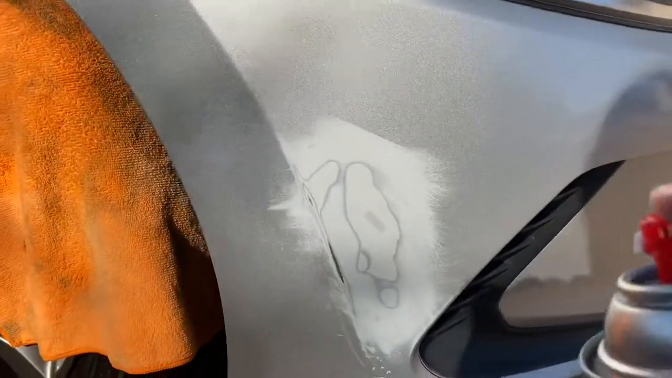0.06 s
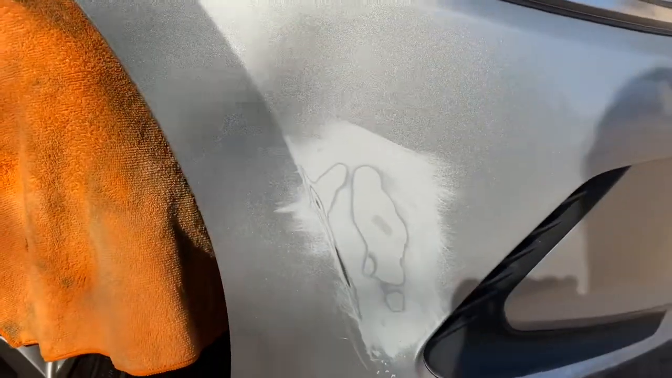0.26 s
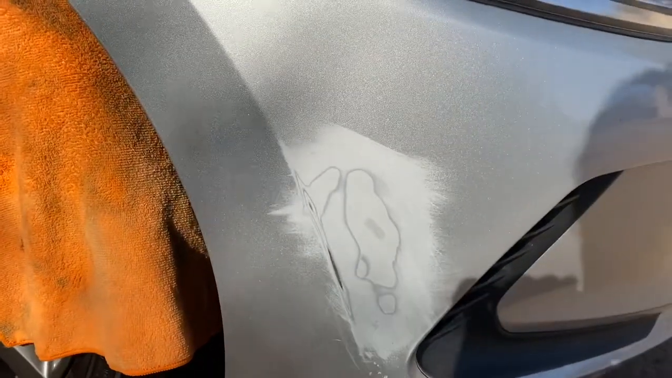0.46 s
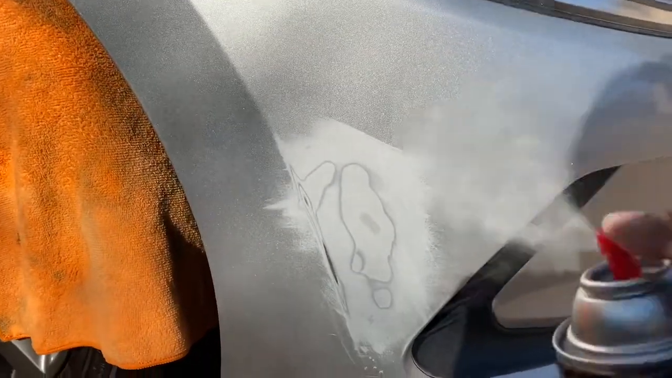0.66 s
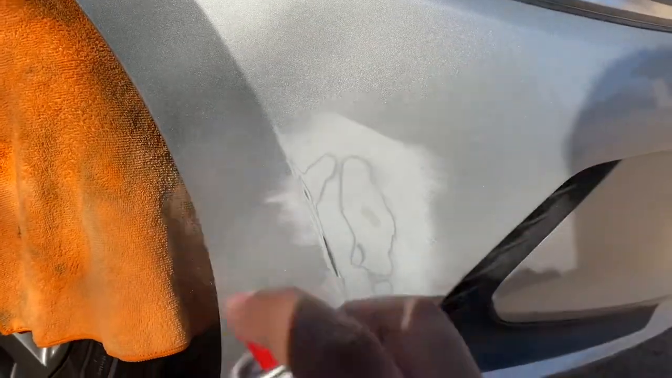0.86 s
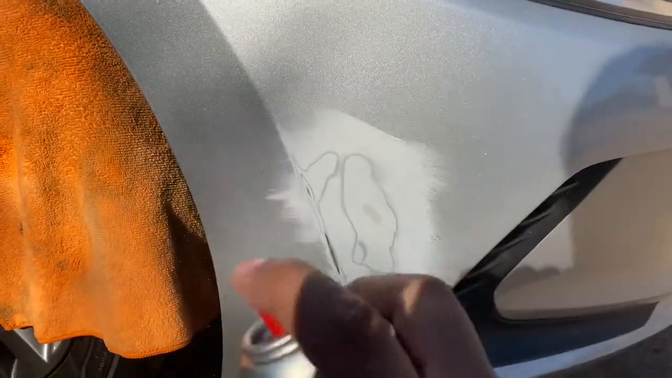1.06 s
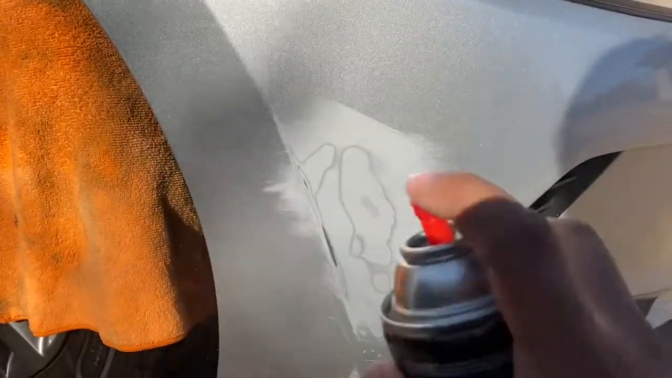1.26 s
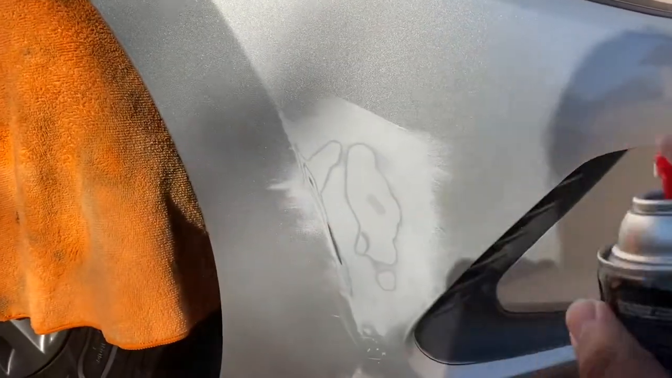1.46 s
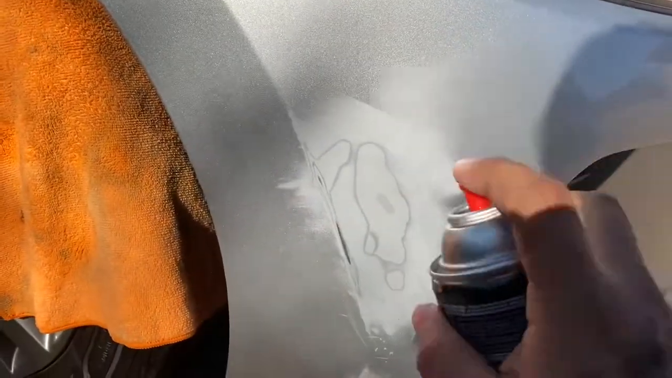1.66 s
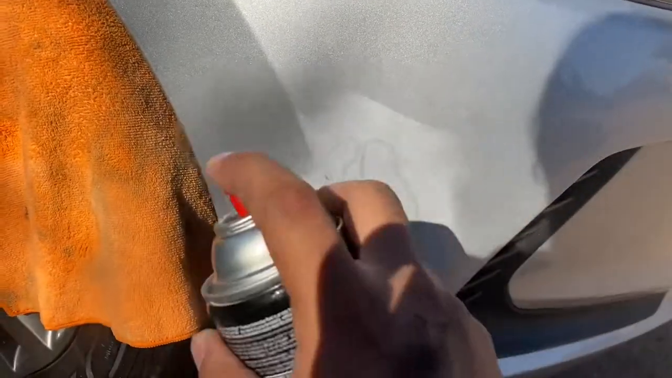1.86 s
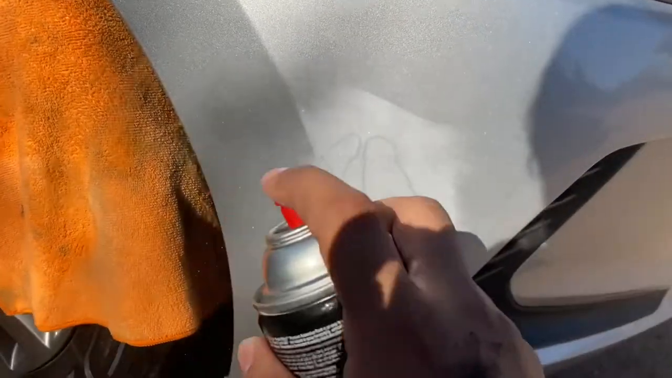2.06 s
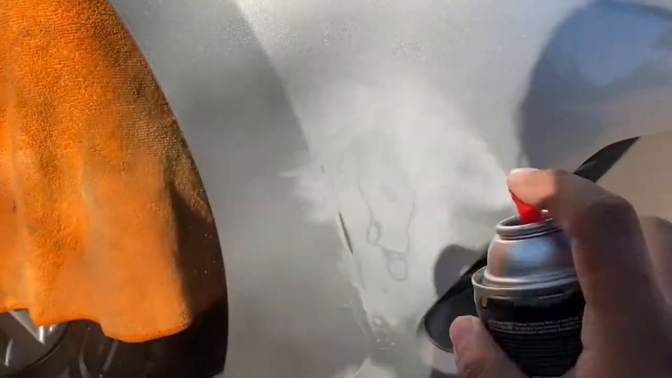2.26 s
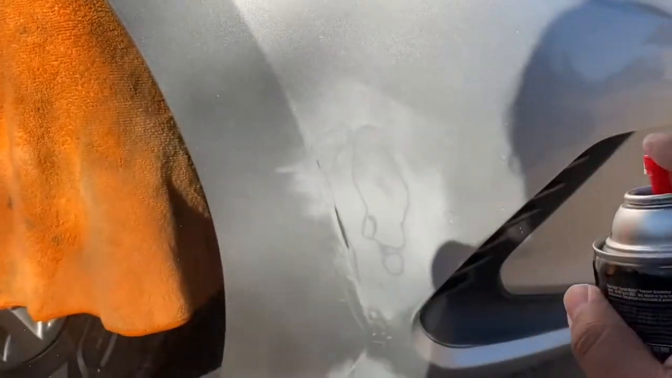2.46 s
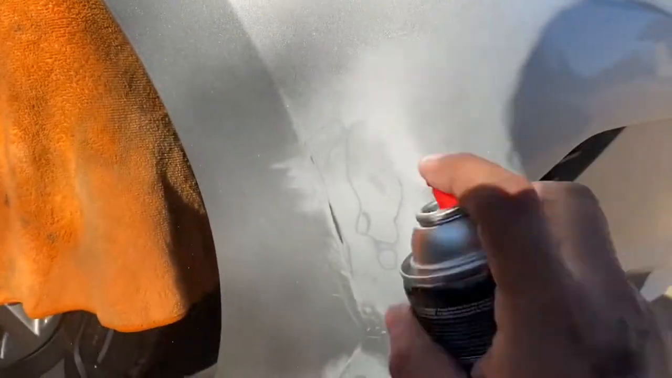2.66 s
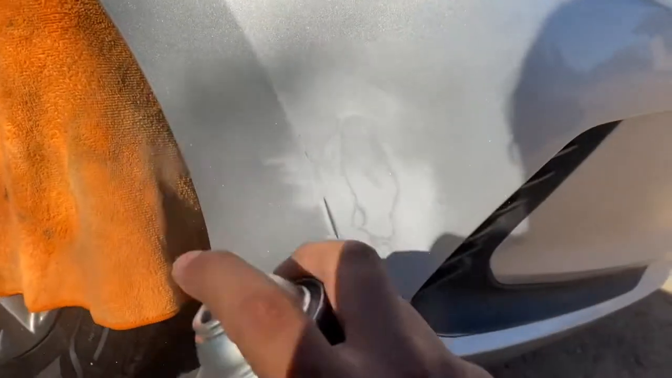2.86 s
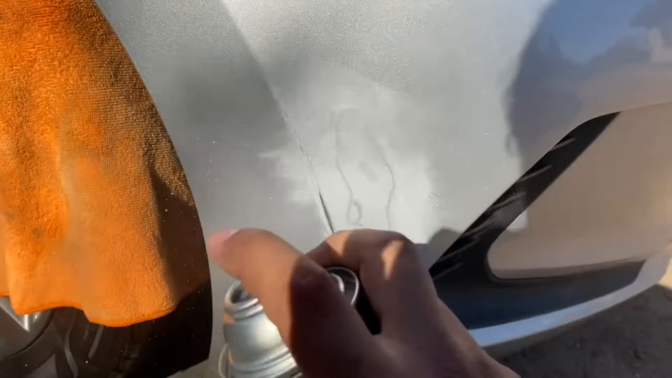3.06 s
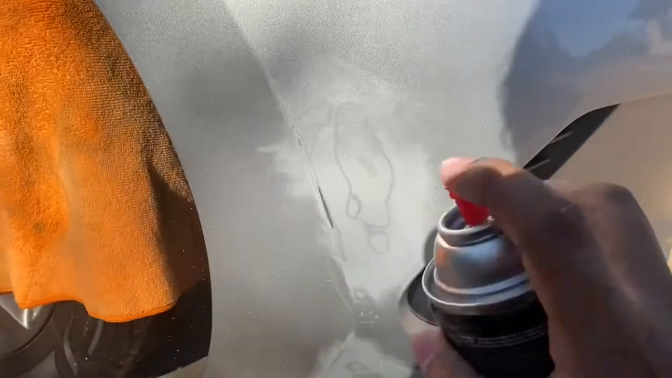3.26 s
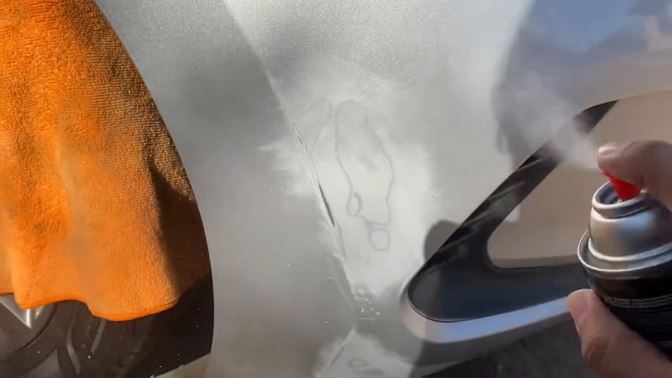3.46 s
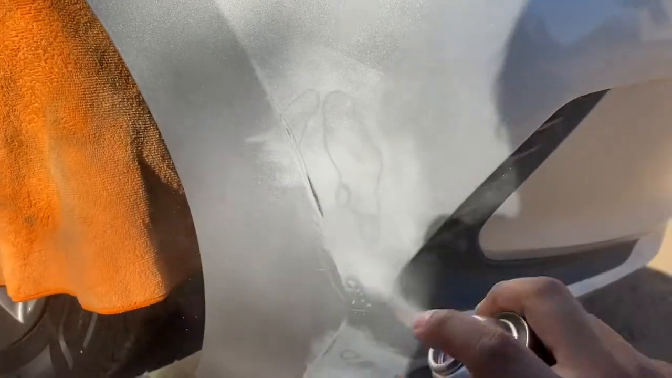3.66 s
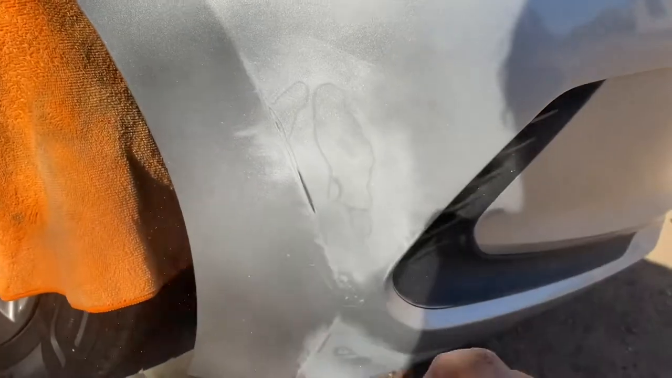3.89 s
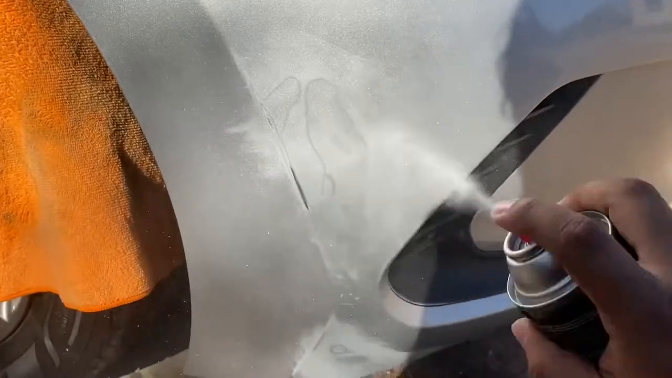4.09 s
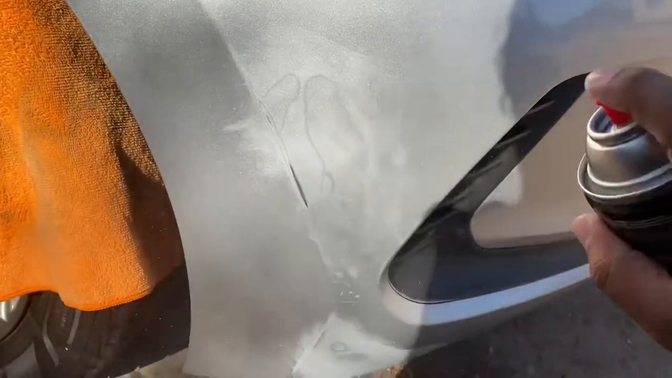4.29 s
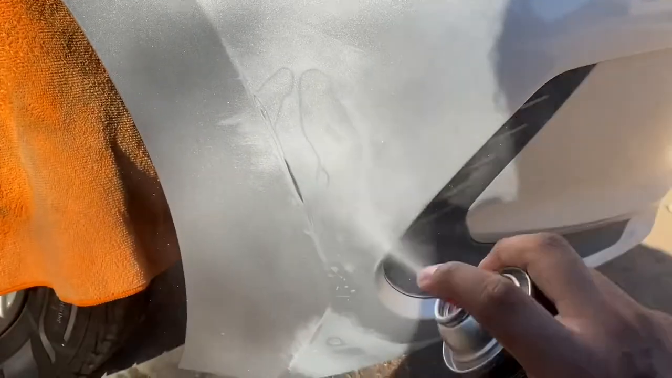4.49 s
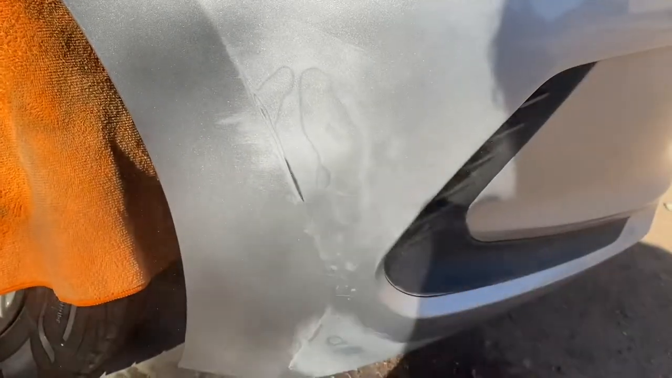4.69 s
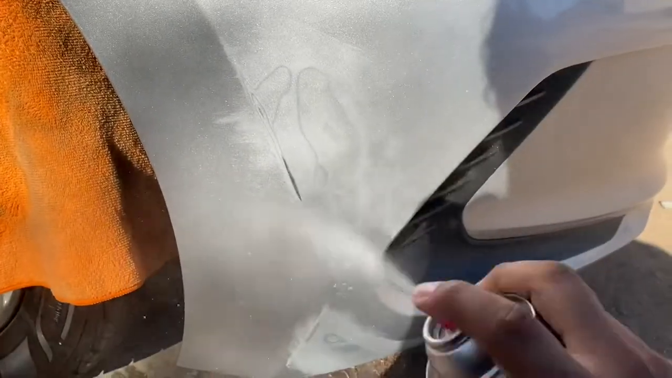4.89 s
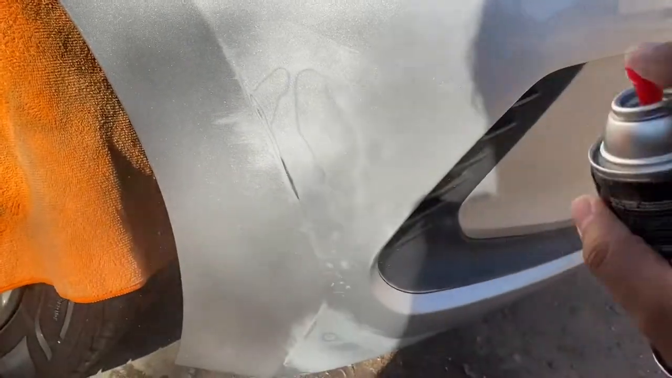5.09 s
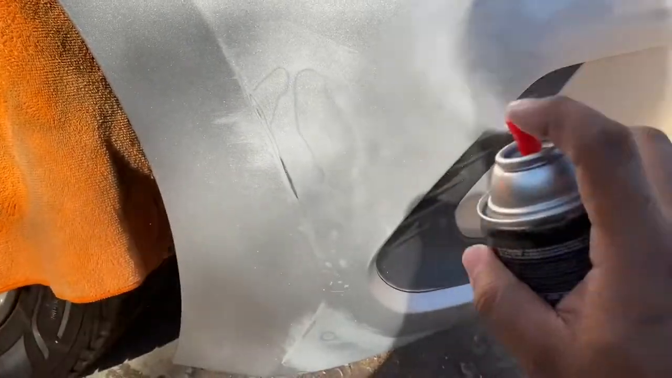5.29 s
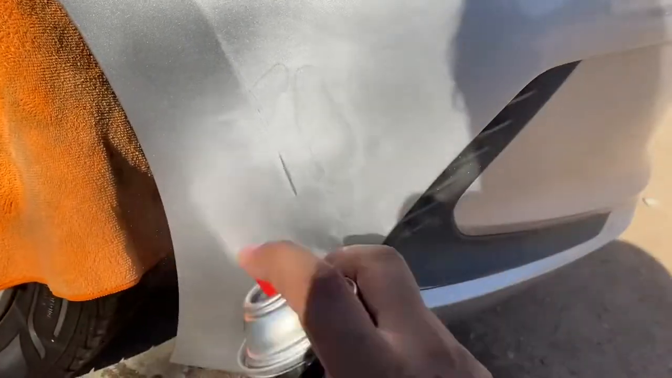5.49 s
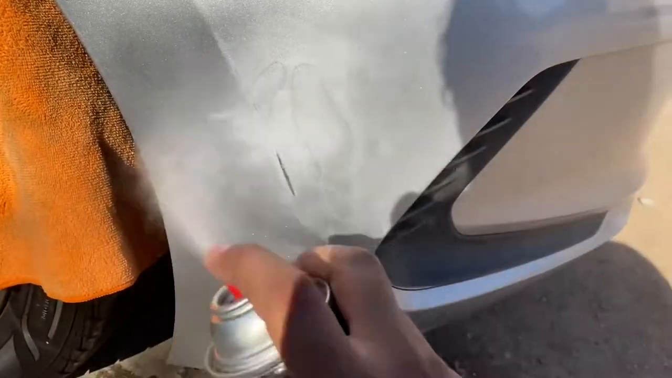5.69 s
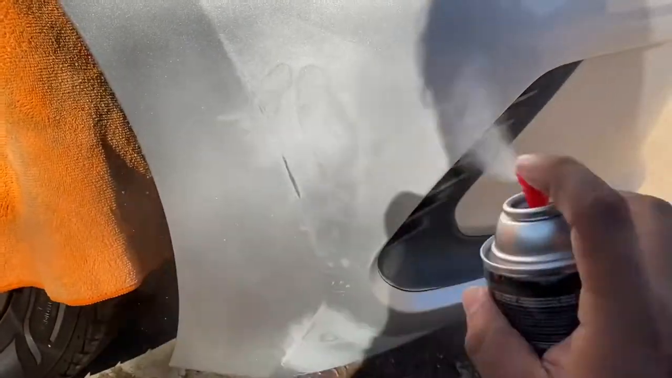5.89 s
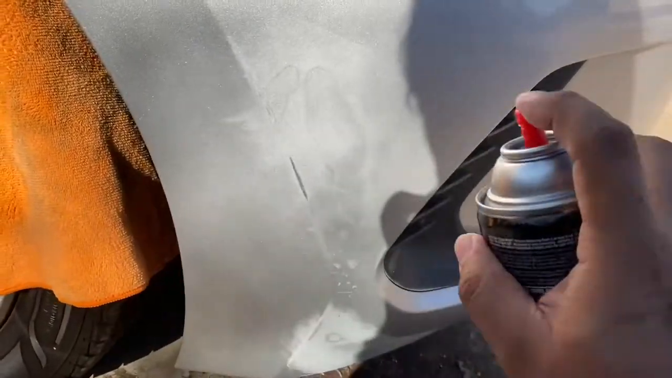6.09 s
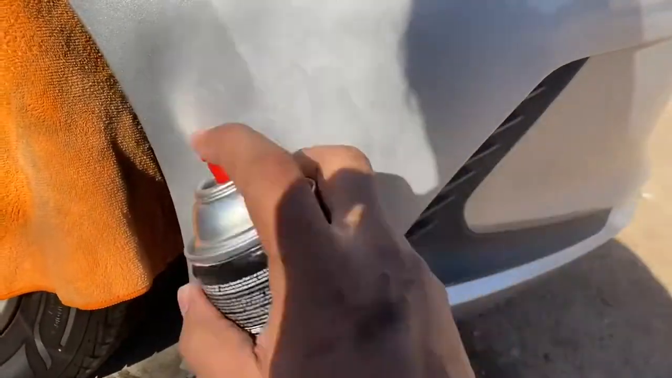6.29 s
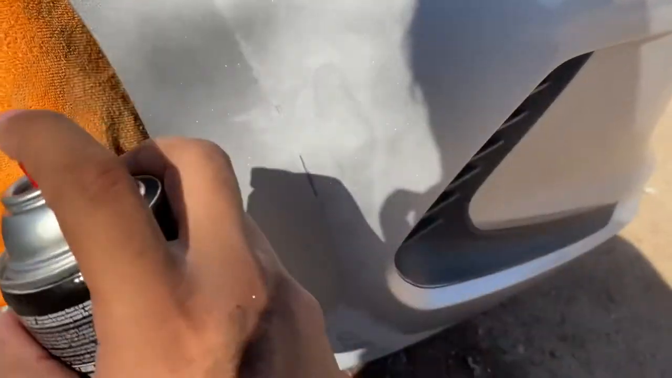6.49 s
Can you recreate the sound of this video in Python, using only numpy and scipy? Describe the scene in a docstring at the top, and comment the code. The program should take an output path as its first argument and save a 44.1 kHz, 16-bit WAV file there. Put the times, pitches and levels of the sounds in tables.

```python
"""Outdoors, by a plastic bumper: a hand sweeps a spray can across it, close to a two-port microphone.
Eleven valve presses gate the jet, shaped noise that turns with the can; two bursts add a delayed copy.
A faint fizz, noise with gliding whistle bands, lingers and returns as the can swings.
Gusts and single buffets thump on the microphone: low noise and short sagging swings.
Behind lie a distant rumble, a steady wash of air and a faint far whine, all filtered noise."""
import sys
import numpy as np
from scipy import signal
from scipy.io import wavfile
from scipy.ndimage import uniform_filter1d

SR = 44100
rng = np.random.default_rng(int(sys.argv[2]) if len(sys.argv) > 2 else 0)


def pcm_store(signal):
    """Save signal as 16-bit PCM."""
    levels = np.round(np.clip(np.atleast_2d(signal), -1, 1) * 32767)
    wavfile.write(sys.argv[1], SR, levels.astype(np.int16).T)


N = 288414
T = np.arange(N) / SR

# left-right settings per frequency; lead turns in steps above 8 kHz:
# (frequency [Hz], left lead [rad], likeness [0-1], left-right [dB], share of the can's bearing [0-1])
PORTS = [(100, 0, .9, 0, 0), (700, .4, .75, 2, .2), (1300, 0, .87, 5, .3), (2600, .3, .8, 4, .5),
         (3500, .8, .55, 2, 1), (5000, 1, .55, 0, 1), (6000, -1.3, .55, 0, 1), (7500, -2.5, .4, 0, .6),
         (8400, -3.3, .88, 0, .1), (9500, -4.6, .7, 0, 0), (10300, -6.28, 1, 0, 0), (11500, -6.28, 1, 0, 0),
         (12100, -8, .75, 0, 0), (12700, -9.42, 1, 0, 0), (13800, -9.42, 1, 0, 0), (14600, -11, .75, 0, 0),
         (15200, -12.57, 1, 0, 0)]
# wind phase left to right: (frequency [Hz], lead [rad])
# negative lead: right leads in gusts, left in buffets
WIND_LEAD = [(20, 1), (100, -1.2), (200, -0.79), (500, -0.71), (900, -1.5)]


def gain_of(db):
    """Decibels to amplitude."""
    return 10 ** (np.asarray(db) / 20)


def evened(x):
    """Scales to rms 1."""
    return x / np.sqrt(np.mean(abs(x) ** 2) + 1e-20)


def over_hz(table, hz):
    """Columns of a table on a log-frequency axis, as column vectors."""
    f, *columns = np.transpose(table)
    return [np.interp(np.log(hz + 1), np.log(f + 1), c)[:, None] for c in columns]


def over_s(tables, t):
    """Columns of stacked time curves, interpolated at the times t."""
    s, *columns = np.vstack(tables).T
    return [np.interp(t, s, c) for c in columns]


def grid(size):
    """Bin frequencies [Hz] and frame times [s] of short-time spectra."""
    return np.fft.rfftfreq(size, 1 / SR), np.arange(4 * N // size + 5) * (size // 4) / SR


def bell(f, centre_hz, half_width_hz):
    """Resonance-shaped peak of height 1."""
    return 1 / (1 + ((f - centre_hz) / half_width_hz) ** 2)


def patches(shape, tall, long):
    """Smooth random field over frequency and time, rms 1; extents in bins and frames."""
    field = rng.standard_normal(shape[::-1]).T
    smooth = uniform_filter1d(field, int(tall), 0)
    return evened(uniform_filter1d(smooth, int(long), 1))


def pair(colour, lead, same, pan_db):
    """Two-channel noise with given colour, left lead, likeness and balance; colour has even power per frame."""
    a, b, c, d = rng.standard_normal(colour.shape[::-1] + (4,)).T
    same, size = np.clip(same, -1, 1), 2 * len(colour) - 2
    common, separate = a + 1j * b, c + 1j * d
    left = common * gain_of(pan_db / 2)
    right = same * common * np.exp(-1j * lead) + np.sqrt(1 - same ** 2) * separate
    right = right / gain_of(pan_db / 2)
    frame_rms = np.sqrt((abs(colour) ** 2).mean(0))
    spectra = np.array([left, right]) * colour / frame_rms
    return evened(signal.istft(spectra, nperseg=size, noverlap=size - size // 4)[1][:, :N])


def flutter(hz, db):
    """Gain that wavers at random up to the rate hz, by db rms."""
    low_pass = signal.butter(2, hz, fs=SR, output="sos")
    slow = signal.sosfiltfilt(low_pass, rng.standard_normal(N))
    return gain_of(db * evened(slow))


def swells(table, t):
    """Power of each row's rise, hold and fall, linear in dB; shape rows x times."""
    s, hold, db, rise, fall = np.transpose(table)[:5, :, None]
    before_db = abs(rise) * np.maximum(s - t, 0)
    after_db = abs(fall) * np.maximum(t - s - hold, 0)
    return gain_of(db - before_db - after_db) ** 2 + 1e-30


def spray():
    """Turbulent jet whose bright crest moves with the hand; two bursts add a delayed copy."""
    # one sweep each: (opens [s], shuts [s], jet before bearing gain [dB], treble before bearing gain [dB],
    # bearing from, to (left-right) [dB], crest of the hiss from, to, before the arch [Hz],
    # share of the delayed copy [0-1], height of the crest [dB])
    bursts = [(0.513, 0.764, -25, -3, -5, 1.5, 2640, 2630, 0.34, 2),
              (1.489, 1.769, -27.5, -3, -7.5, 3.5, 2550, 2950, 0, 5),
              (2.018, 2.275, -27.5, -4, 4.5, -8, 2600, 2660, 0, 4),
              (2.497, 2.764, -27, -4, -7.5, 5, 2740, 3040, 0.24, 3),
              (3.372, 3.694, -27.5, -4.5, -6.5, 1, 2550, 2890, 0, 3),
              (3.858, 4.113, -28, -4.5, 3.5, -8, 3005, 2900, 0, 9),
              (4.286, 4.575, -28, -4, -7.5, 1.5, 3070, 3010, 0, 9.5),
              (4.744, 5.021, -28, -4.5, -2.5, -7, 2940, 2570, 0, 5.5),
              (5.192, 5.468, -28, -3.5, -5.5, 4, 2580, 2650, 0, 6.5),
              (5.619, 5.856, -27.5, -2.5, 5.5, -4.5, 2690, 2880, 0, 9),
              (6.04, 6.304, -28, -3, -3, 7.5, 2760, 2740, 0, 7.5)]
    # nozzle and microphone colour: (frequency [Hz], density [dB per Hz])
    nozzle = [(200, -24.5), (600, -13), (1100, -5.5), (1900, -5.5), (2700, -3.5), (3600, -5.5),
              (4700, -2.5), (6200, -0.5), (7400, 0), (8400, 2), (9900, -6), (12000, -3), (14500, 0.5),
              (16000, -5.5)]
    rise_s, starved_db, close_s = 0.012, -25, 0.029
    resonance_hz, resonance_half_width_hz, resonance_db = 2050, 250, 4

    hz, t = grid(size=512)
    f = hz[:, None]
    curves = [sweep(*row) for row in bursts]
    _, crest_hz, presence_db, treble_db, bearing_db, share, height_db = over_s(curves, t)
    lead, same, pan_db, turn = over_hz(PORTS, hz)

    delay_s = 3 / crest_hz  # three periods of the crest
    with_copy = 1 + np.clip(share, 0, .9) * np.exp(-2j * np.pi * f * delay_s)
    colour_db = over_hz(nozzle, hz)[0] + height_db * bell(f, crest_hz, 300)
    colour_db = colour_db + resonance_db * bell(f, resonance_hz, resonance_half_width_hz)
    colour_db = colour_db + presence_db * np.exp(-((f - 5900) / 1700) ** 2)
    colour_db = colour_db + treble_db * np.clip((f - 6500) / 3500, 0, 1)
    # random patches drift through the hiss
    colour = gain_of(colour_db) * with_copy * gain_of(2.9 * patches(colour_db.shape, tall=4.5, long=45))
    wander_rad = .5 * turn * patches(colour.shape, tall=6.3, long=36)
    hiss = pair(colour, lead + wander_rad, same, pan_db + turn * bearing_db)

    flow = np.zeros(N)
    for opens, shuts, *_ in bursts:
        filling = np.clip((T - opens) / rise_s, 0, 1)
        starved = np.clip(filling * 4, 0, 1) * gain_of(starved_db * (1 - filling))
        seating = np.clip(1 - (T - shuts) / close_s, 0, 1) ** 2.22
        flow += starved * seating
    return hiss * flow * gain_of(over_s(curves, T)[0]) * flutter(400, 0.56)


def sweep(opens, shuts, jet_db, treble_db, from_db, to_db, from_hz, to_hz, share, height_db):
    """One burst's motion: (s, jet dB, crest Hz, presence dB, treble dB, bearing dB, share, crest dB)."""
    front_db, front_presence_db = -0.5, -4.5  # bearing of the dullest hiss, and its presence there
    # (presence, treble, level) growth, dB per dB of bearing off the front
    right_gains, left_gains = (0.65, 0.28, 0.031), (1.72, 0.6, 0.22)
    arch_hz = 90  # crest bulges upward mid-sweep

    u = np.arange(9) / 8
    bearing_db = from_db + (to_db - from_db) * u
    off_db = bearing_db - front_db
    growth_left = np.outer(left_gains, np.maximum(off_db, 0))
    growth_right = np.outer(right_gains, np.maximum(-off_db, 0))
    presence, treble, level = growth_left + growth_right
    crest_hz = from_hz + (to_hz - from_hz) * u + arch_hz * np.sin(np.pi * u)
    return np.transpose([opens + (shuts - opens) * u, jet_db + level, crest_hz, front_presence_db + presence,
                         treble_db + treble, bearing_db, share + 0 * u, height_db + 0 * u])


def fizz():
    """Faint uneven noise that whistles in a few bands moving together."""
    # after a burst or as the can swings: (time [s], hold [s], level [dB], rise [dB/s], fall [dB/s],
    # upper whistle before glide [Hz], strength of lower rings [0-1], of upper rings [0-1])
    fizz_swells = [(.13, 0.062, -67.5, 150, 105, 4380, 0.6, .2),
                   (.25, 0.099, -60.5, 300, 250, 4590, 0.3, 0.8),
                   (0.78, 0.034, -54, 896, 98, 4500, .7, 0.3), (1.11, .06, -55.5, 204, 107, 4400, 0.7, .7),
                   (1.202, 0.013, -53.5, 125, 57, 4550, 0.7, 0.6),
                   (1.802, 0.039, -51, 895, 100.5, 4700, 0.95, .5),
                   (2.294, 0.027, -55, 899, 175, 4410, .9, 0.5),
                   (2.789, 0.026, -56, 900, 80, 4460, 0.4, 0.1),
                   (3.019, 0.14, -57, 250, 304, 4430, 0.7, 0.6), (3.72, .02, -62, 902, 63, 4360, 0.4, 0),
                   (4.14, .02, -67, 903, 52, 4300, 0.4, 0.3), (4.597, 0.036, -63, 903, 70, 4400, .5, 0.2),
                   (5.16, .03, -58, 80, 200, 4500, 0.9, 0.76), (5.493, 0.041, -53, 900, 89, 4520, 0.5, .7),
                   (5.877, .09, -49.5, 900, 34, 4520, 0.7, .65),
                   (6.326, 0.033, -45.5, 900, 79, 4550, .5, 1)]
    # noise colour without rings: (frequency [Hz], density [dB per Hz])
    fizz_colour = [(500, -8.5), (1500, -12), (3500, -13), (5500, -16.5), (8000, -16.5), (16000, -30.5)]
    # whistle bands: (multiple of whistle [1], full width [Hz], height at full strength [dB])
    rings = [(0.498, 200, 21.5), (.62, 150, 6.5), (.87, 250, 8), (1, 250, 25), (1.29, 294, 3.5)]
    floor_db, glide_hz_per_s = -73, 1100  # whistle creeps up while a swell holds
    even_treble_db, dulling_db_per_db = -54.5, 0.53  # treble falls with level

    hz, t = grid(size=512)
    f = hz[:, None]
    lead, same, pan_db, _ = over_hz(PORTS, hz)
    power = swells(fizz_swells, t)
    s, hold, *_, whistle_hz, lower, upper = np.transpose(fizz_swells)[..., None]
    level = np.sqrt(power.sum(0) + gain_of(floor_db) ** 2)
    whistle_hz = whistle_hz + glide_hz_per_s * np.clip(t - s, 0, hold)
    # the strongest swell dominates each setting
    whistle_hz, lower, upper = [(power * c).sum(0) / power.sum(0) for c in (whistle_hz, lower, upper)]

    colour_db = over_hz(fizz_colour, hz)[0]
    for multiple, width_hz, ring_db in rings:
        strength = np.clip(lower if multiple < .75 else upper, 0, 1)
        colour_db = colour_db + strength * ring_db * bell(f, multiple * whistle_hz, width_hz / 2)
    treble_db = dulling_db_per_db * (20 * np.log10(level) - even_treble_db)
    colour_db = colour_db + treble_db * np.clip((f - 6000) / 4000, 0, 1)
    colour = gain_of(colour_db + 3.0 * patches(colour_db.shape, tall=3.7, long=23))
    return pair(colour, lead, same, 1.7 * pan_db) * np.interp(T, t, level) * flutter(83, 1.2)


def wind():
    """Lumpy low pressure swings, brightness set by each gust, nearly one signal phase-shifted between ports."""
    # gusts on the microphone: (time [s], hold [s], level [dB], rise [dB/s], fall [dB/s],
    # brightness at that time [dB per octave])
    gust_table = [(0.094, .01, -45, 148, 150, -12), (0.252, .01, -45, 146, 100, -15),
                  (0.462, .02, -44.5, 100, 60, -19), (.7, .02, -49, 47, 84, 11),
                  (1.737, .015, -14.5, 2501, 402.5, 6.5), (1.762, 0.041, -17.5, 404.5, 350, 1),
                  (1.86, 0.043, -18, 202, 130, -3), (2.016, 0.052, -19, 251, 300, -9),
                  (2.152, 0.019, -19.5, 301.5, 301, -12.5), (2.22, .06, -30, 200, 316, -7.5),
                  (3.18, .06, -41, 252, 303.5, -17.5), (3.35, 0.05, -47, 121.5, 144, -6),
                  (3.44, 0.0042, -26, 899, 256, -0.5), (3.545, .09, -32, 506, 124.5, 6),
                  (3.69, .06, -33.5, 203, 146, -2), (3.914, .01, -41, 354, 347, -17),
                  (4.64, .02, -58, 201, 60, 4.5), (4.78, 0.0085, -38.5, 306, 125, -13),
                  (4.88, .01, -44.5, 107, 80, 8), (5.354, 0.026, -31.5, 145, 176, -20),
                  (5.754, 0.04, -37, 300, 188, -8), (6.034, 0.0092, -34.5, 248, 253, -9.5),
                  (6.213, .005, -38, 450, 305, -11), (6.287, 0.0095, -29.5, 500, 800, -10),
                  (6.395, 0.015, -35.5, 116, 320, -18), (6.528, .02, -31, 304, 300, -9)]
    # breeze under the gusts: (time [s], level [dB])
    breeze_table = [(0, -63), (.3, -51), (.9, -58.5), (1.46, -51), (1.68, -48), (2.4, -75), (3.1, -56),
                    (3.5, -53.5), (3.85, -51.5), (4.0, -69), (4.58, -69), (5.0, -51.5), (5.25, -47),
                    (5.6, -49.5), (5.94, -50.5), (6.15, -47), (6.54, -51)]
    # colour before brightness: (frequency [Hz], density [dB per Hz])
    wind_colour = [(20, -29), (45, -9), (75, 0), (110, 1), (160, -13.5), (260, -10.5), (350, -7.5),
                   (700, -34), (1160, -56), (2000, -78.5), (4000, -120)]
    breeze_bright_db, spent_db_per_s = 0, 46.5  # per octave; a gust dulls as it runs on
    likeness = .997

    hz, t = grid(size=1024)
    s, *_, onset_db = np.transpose(gust_table)[..., None]
    gusts = swells(gust_table, t)
    breeze = gain_of(over_s([breeze_table], t)[0]) ** 2
    bright_db = ((onset_db - spent_db_per_s * np.maximum(t - s, 0)) * gusts).sum(0)
    bright_db = (bright_db + breeze_bright_db * breeze) / (gusts.sum(0) + breeze)
    bright_db = bright_db + 4.04 * patches((1, len(t)), tall=1, long=4)  # brightness flickers at random
    octaves = np.clip(np.log2(hz[:, None] / 200 + 1e-3), 0, 1.5)  # above 200 Hz
    colour = gain_of(over_hz(wind_colour, hz)[0] + bright_db * octaves)
    lumps = pair(colour, over_hz(WIND_LEAD, hz)[0], likeness, 0) * flutter(37, 3.74)
    gust_power = sum(swells([row], T)[0] for row in gust_table)
    breeze_power = gain_of(over_s([breeze_table], T)[0]) ** 2
    return evened(lumps) * np.sqrt(gust_power + breeze_power)


def buffets():
    """Wind slaps the ports: a short swing whose pitch sags as it dies."""
    # single slaps: (time [s], level before attack and decay [dB], pitch 2 ms in [Hz])
    slaps = [(1.732, 0, 154), (1.768, -7, 230), (1.86, -21.5, 378), (1.885, -12, 330), (1.999, -24, 203),
             (2.157, -27, 295), (3.445, -15, 233), (3.482, -18, 342), (3.538, -31, 380), (3.609, -25, 560),
             (3.624, -19.5, 600), (3.689, -25, 300), (3.705, -24.5, 540), (3.739, -24.5, 614),
             (3.912, -45, 151), (5.757, -27, 260), (6.202, -30, 152), (6.284, -26, 151)]
    attack_s, decay_s = 0.0011, 0.0037

    out, t = np.zeros((2, N)), np.arange(2000) / SR
    envelope = np.minimum(t / attack_s, 1) * np.exp(-t / decay_s)
    for (s, db, hz), phase in zip(slaps, rng.uniform(0, 2 * np.pi, len(slaps))):
        angle = 2 * np.pi * hz * 0.014 * np.log(1 + t / .012) + phase
        lead = over_hz(WIND_LEAD, np.array([hz]))[0]
        swing = np.sin(angle + lead * np.array([[0], [1]])) * envelope
        out[:, round(s * SR):][:, :len(t)] += gain_of(db) * swing
    return out


def rumble():
    """A distant low drone of varying level over a steady outdoor wash of air."""
    # drone spectrum: (frequency [Hz], density [dB per Hz])
    drone = [(25, -25), (45, -6), (58, 1), (75, -9), (95, -14), (118, -7), (140, -14), (170, -13),
             (230, -22), (300, -20), (420, -30), (600, -45), (2000, -110)]
    # drone course: (time [s], level [dB])
    drone_level = [(0, -46), (1.27, -44.5), (1.38, -46), (1.56, -42.5), (1.91, -55), (2.02, -47),
                   (2.44, -52), (2.75, -55), (3.08, -53.5), (3.6, -40.5), (3.95, -55.5), (4.4, -51),
                   (4.6, -48), (4.99, -52), (5.43, -48), (5.74, -60), (6.1, -49), (6.54, -64)]
    # air spectrum: (frequency [Hz], density [dB per Hz])
    air = [(120, -37), (200, -53), (254, -12), (704, -4.5), (938, -10), (1440, -10), (2150, -17.5),
           (3690, -27.5), (9000, -51.5), (11700, -95.5), (19800, -120)]
    air_db = -56.5
    low = wash(drone, size=8192) * gain_of(over_s([drone_level], T)[0])
    return low + wash(air, size=1024) * gain_of(air_db)


def wash(spectrum, size):
    """Far steady noise with drifting patches, near mono in the bass."""
    # correlation between ports: (frequency [Hz], likeness [-1 to 1])
    likeness = [(60, 1), (240, 0.74), (950, -0.21), (3770, -0.26), (15000, -0.29)]
    hz, t = grid(size)
    drift_db = 1.4 * patches((len(hz), len(t)), tall=4.9, long=5.3)
    colour = gain_of(over_hz(spectrum, hz)[0] + drift_db)
    return pair(colour, 0, over_hz(likeness, hz)[0], 0)


def whine():
    """Faint far narrow fuzzy band of noise that comes and goes, alike at both ports."""
    # appearances: (time [s], hold [s], level [dB], rise [dB/s], fall [dB/s])
    whine_swells = [(.07, 0.14, -65, 150, 100), (1.25, 0.164, -61.5, 80, 120)]
    pitch_hz, width_hz = 1388, 110
    edges_hz = pitch_hz + width_hz * np.array([-.5, .5])
    band_pass = signal.butter(2, edges_hz, "band", fs=SR, output="sos")
    band = signal.sosfilt(band_pass, rng.standard_normal(N))
    return evened(band) * np.sqrt(swells(whine_swells, T).sum(0))


def scene():
    """All sources at the two ports."""
    return spray() + fizz() + wind() + buffets() + rumble() + whine()


def record(dry):
    """The microphone's low cut, then the band limit."""
    low_cut_hz, edge_hz = 41, 15800
    low_cut = signal.butter(3, low_cut_hz, "high", fs=SR, output="sos")
    band_limit = signal.firwin(511, edge_hz, window=("kaiser", 9), fs=SR)
    return signal.oaconvolve(signal.sosfilt(low_cut, dry), band_limit[None], "same")


dry = scene()
out = record(dry)
pcm_store(out)
```